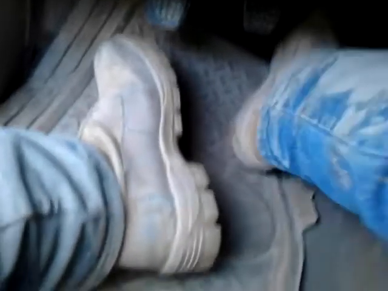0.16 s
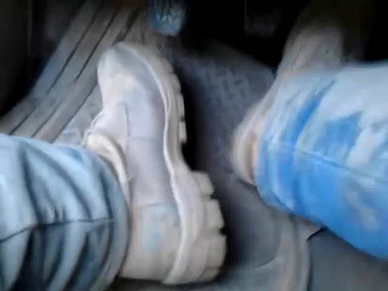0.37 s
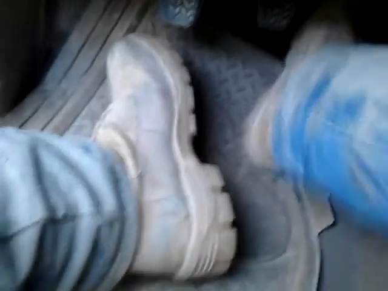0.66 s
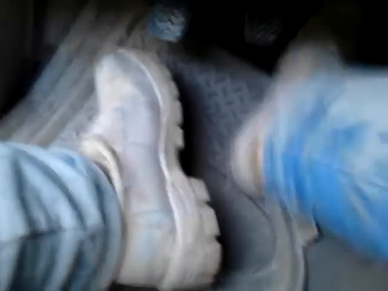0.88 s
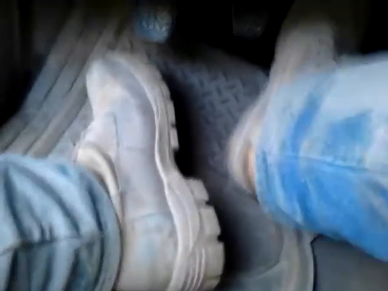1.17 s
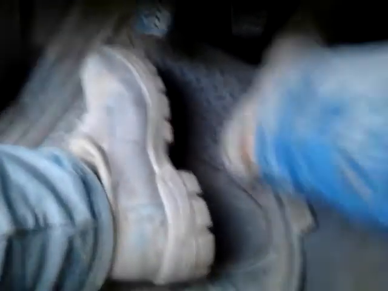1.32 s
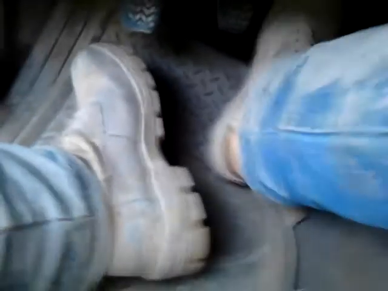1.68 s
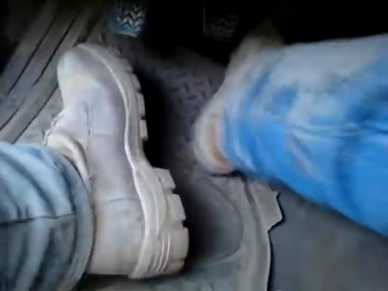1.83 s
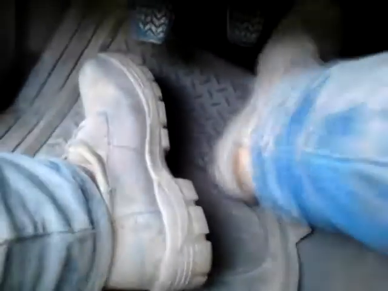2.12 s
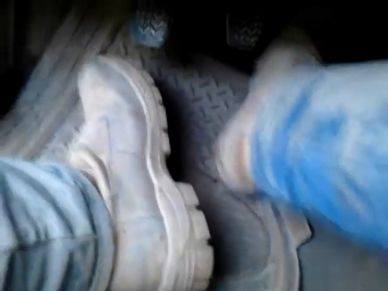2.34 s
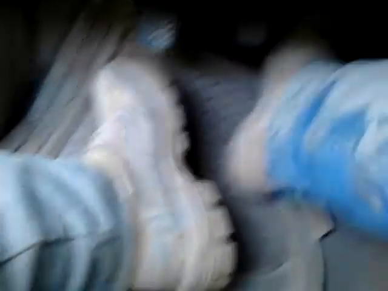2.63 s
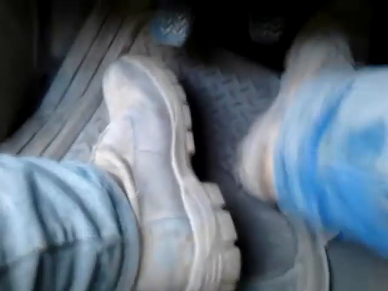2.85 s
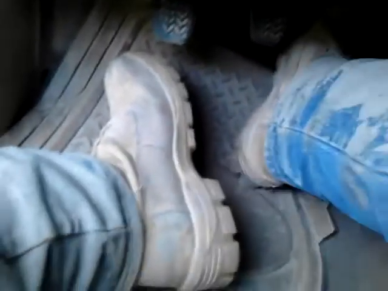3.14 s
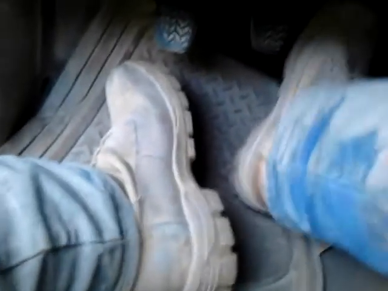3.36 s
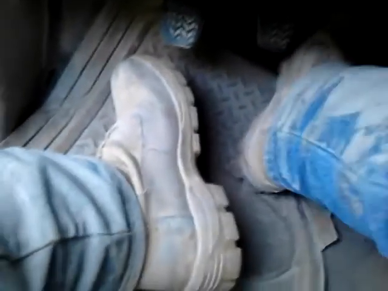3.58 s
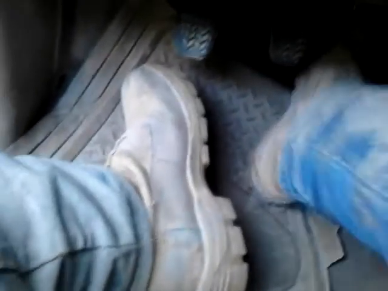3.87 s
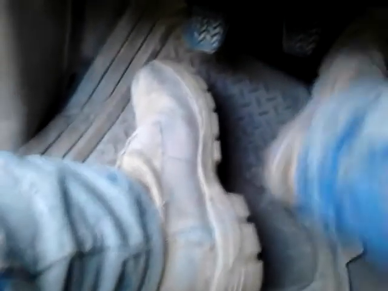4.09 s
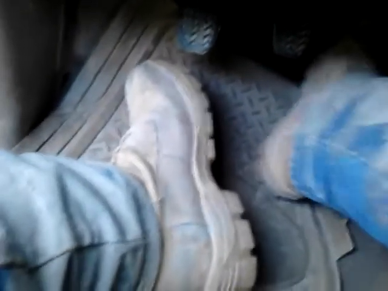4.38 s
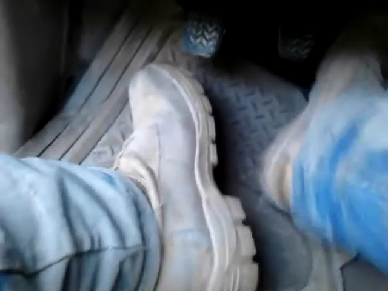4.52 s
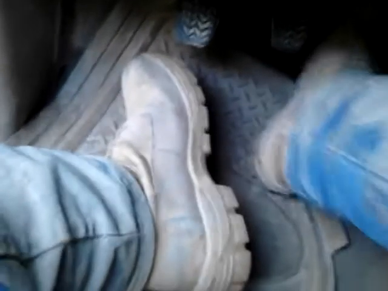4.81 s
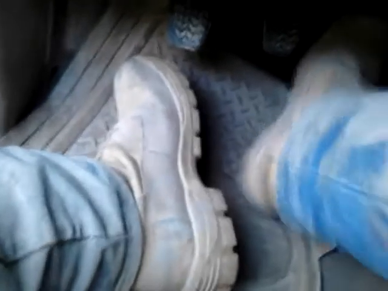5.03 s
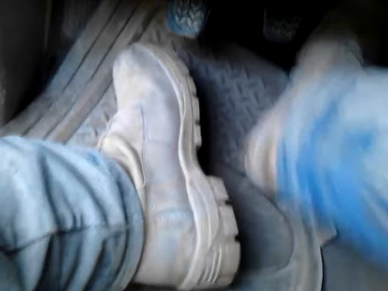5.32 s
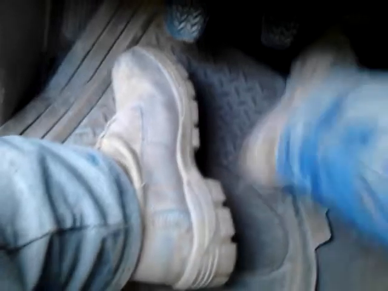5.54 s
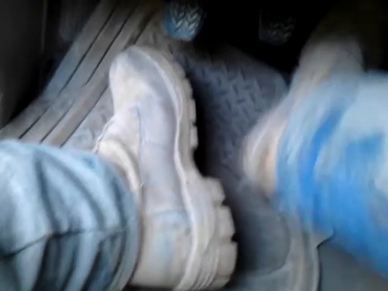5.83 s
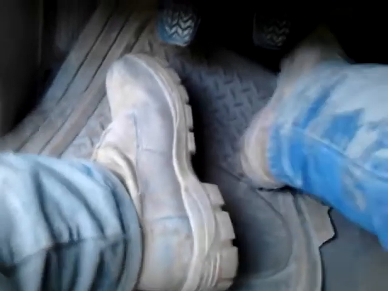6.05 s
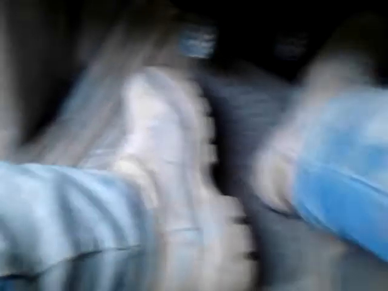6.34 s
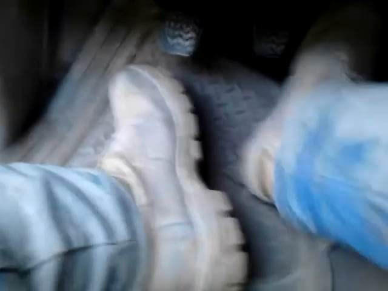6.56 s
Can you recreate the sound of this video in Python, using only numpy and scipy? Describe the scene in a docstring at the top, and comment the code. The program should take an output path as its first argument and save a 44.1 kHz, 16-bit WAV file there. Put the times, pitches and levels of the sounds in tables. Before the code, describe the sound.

Inside a car footwell, a shoe pumps a pedal a little over twice a second. Each press lands as a low, boomy thud with a loose rattle, answered by softer double knocks as the pedal rises. Hard plastic clicks and thin metallic tinkles sound near the handheld microphone, with brief hoarse squeaks. In the later part, cloth scrapes grittily across its case. Low cabin rumble, faint hiss and hum stay underneath.

```python
"""A pedal in a car's footwell, pumped by a foot a little over twice a second: each blow rings the floor's low
modes, shakes filtered noise out of the linkage and clunks the arm, both on the stop and on the way back up.
Plastic clicks and thin tinkles (decaying sine modes) sound near the hand-held microphone; hoarse gliding
squeaks join in, and later cloth, as resonant gritty noise, slides over its case in groups of two or three
strokes. Below lie a low cabin rumble, a faint hiss, the rustle of shoe and trousers and a faint hum."""
import sys
import numpy as np
from scipy import signal
from scipy.fft import rfft, irfft, next_fast_len
from scipy.io import wavfile
from scipy.ndimage import map_coordinates

SR = 44100
rng = np.random.default_rng(int(sys.argv[2]) if len(sys.argv) > 2 else 0)


def waveform_to_disk(signal):
    """Save audio, clipped to [-1, 1], as 16-bit WAV at the path in sys.argv[1]."""
    frames = np.transpose(np.atleast_2d(signal))
    scaled = np.clip(frames, -1, 1) * 32767
    samples = np.round(scaled).astype(np.int16)
    wavfile.write(sys.argv[1], SR, samples)


N = 295425
T = np.arange(int(.2 * SR)) / SR  # time axis of one hit, s

# Levels are relative: layers trim them further. Hits vary around the listed mode pitches.

# low background: rumble level over time (t/s, level/dB)
CABIN_LEVEL = [(0.0, -47), (1.96, -45.5), (3.97, -48.5), (4.4, -44), (4.74, -47.5), (6.7, -42.5)]
# spectra of the background noises (f/Hz, level/dB)
RUMBLE_COLOUR = [(12, -29.5), (20, -14), (32, 2), (50, -0.5), (66, 1.5), (90, -0.5), (136, -4.5),
                 (183, -11.5), (259, -12.5), (326, -17.5), (460, -30), (770, -69.5)]
RUSTLE_COLOUR = [(150, -39), (250, 0.5), (627, -4.5), (660, -4), (849, -7.5), (1150, -10.5), (1440, -11),
                 (1710, -16.5), (1870, -13.5), (2800, -21.5), (3640, -44.5), (6160, -120)]
HISS_COLOUR = [(1800, -25), (2800, 0.5), (3700, 8.5), (4500, 3), (6300, 3.5), (7400, -11.5)]
TROUSER_COLOUR = [(700, -0.5), (1500, -2.0), (3000, -1), (6300, 3.5), (7400, -4.5)]
# trousers brush as the leg moves (t/s, half-width/s, level/dB)
TROUSER_SWISHES = [(0.46, 0.13, -64), (0.99, .08, -78), (1.33, 0.079, -57), (2.42, 0.12, -69),
                   (3.05, 0.12, -60), (3.7, 0.44, -62), (5.12, 0.076, -62)]
# faint steady hum in the cabin (f/Hz, level/dB)
HUM_TONES = [(34.5, -52), (69, -59), (90.5, -55.5), (121, -57)]
# tiny ticks of sole and mat (f/Hz, level/dB)
CRUMB_COLOUR = [(400, 8.5), (1000, 2), (2200, -8), (4000, -11)]

# pedal meets the floor stop (t/s, thud/dB)
STOP_HITS = [(0.1055, -31), (0.5164, -36), (0.909, -29.5), (1.323, -28), (1.763, -27), (2.154, -27),
             (2.5729, -25), (3.0304, -29.5), (3.4499, -31.5), (3.8957, -27.5), (4.33, -27), (4.737, -36),
             (5.1041, -29), (5.5545, -24), (6.0412, -24), (6.423, -24.5)]
# pedal and shoe knock between presses (t/s, thud/dB, rattle/dB, tick/dB, floor shudder/dB)
LIFT_KNOCKS = [(0.218, -33.5, -46, -54, -34), (0.320, -40.5, -43.5, -48, -33.5),
               (0.617, -36.5, -51, -54, -40), (0.715, -37, -41, -38, -43), (1.0463, -34, -44, -45, -30.5),
               (1.1268, -34.5, -42, -47, -48), (1.4564, -33.5, -44.5, -50, -34),
               (1.553, -35.5, -42.5, -43, -40), (1.886, -34, -42.5, -36, -28.5),
               (1.9677, -30, -40, -43, -35), (2.2864, -37, -62, -64, -55),
               (2.3804, -34, -40.5, -37.5, -31.5), (2.732, -30.5, -48, -44.5, -29),
               (2.817, -32, -43.5, -48, -30.5), (3.154, -34.5, -45.5, -45, -33),
               (3.2537, -38, -38.5, -50, -39), (3.5795, -34.5, -46.5, -54, -42),
               (3.689, -40, -42, -43, -54), (4.0364, -25.5, -42, -45, -27),
               (4.0947, -30.5, -37.5, -48, -29), (4.4621, -27, -45.5, -40, -33),
               (4.5217, -31, -40, -41, -27), (5.7085, -25, -37, -47, -45), (5.775, -31, -41.5, -44, -26),
               (6.1511, -33, -51, -42, -37), (6.5285, -35, -49.5, -50, -30)]
# modes of floor pan and cabin air (f/Hz, level/dB, t60/s at damping 1)
FLOOR_MODES = [(94.2, 2.5, 0.16), (118.9, -1, 0.1), (141, -1, 0.1), (179.1, -13.5, 0.15),
               (251, -15.5, 0.17)]
# loose linkage and trim (f/Hz, level/dB)
LINKAGE_COLOUR = [(150, -14.5), (260, 8), (330, 4), (400, -1.5), (490, 4.5), (630, -4.5), (770, -5.5),
                  (1100, -13.5), (1700, -21.5), (2200, -24.5), (4000, -23), (7000, -42.5)]
# modes of the pedal arm (f/Hz, level/dB, t60/s)
ARM_MODES = [(309, -0.5, 0.079), (457, -2.5, 0.069), (542, -5, 0.078), (754, -8.5, 0.054)]

# hard plastic clicks; the harder the contact, the higher the upper edge
# (t/s, level/dB, body/dB, lower ring f/Hz, upper ring f/Hz, upper edge f/Hz)
PLASTIC_CLICKS = [(0.3185, -41.5, 13, 750, 1520, 4000), (0.7754, -15.5, -0.5, 1045, 2040, 3540),
                  (1.098, -42, 9, 700, 1890, 3800), (1.702, -39.5, 5, 750, 1480, 4100),
                  (1.7767, -26.5, -7, 1530, 1850, 2960), (1.804, -37.5, 2, 1500, 2090, 5000),
                  (1.8392, -39, 10, 1730, 3750, 5000), (1.8795, -40, 12, 800, 1500, 2400),
                  (1.895, -33.5, 4, 620, 1410, 2170), (1.9377, -34, 0, 720, 1510, 2000),
                  (2.0115, -21.5, -4, 640, 1475, 2500), (2.384, -41, 6, 565, 1290, 2400),
                  (2.727, -42, 1, 565, 1000, 2200), (2.798, -35.5, 9.5, 500, 970, 1990),
                  (3.06, -36.5, -16, 1000, 1300, 2800), (3.0825, -35.5, -3, 1050, 1700, 2400),
                  (3.14, -34, -7, 600, 1100, 1600), (3.1477, -27, 6.5, 560, 1030, 1900),
                  (3.2219, -22, 8.5, 500, 1040, 3020), (3.4121, -27.5, 3, 595, 1200, 3400),
                  (3.4972, -42, 11, 2400, 3000, 4200), (3.5501, -21.5, 1, 596, 3010, 3700),
                  (3.6164, -32, 4, 620, 1040, 3500), (3.6351, -29.5, 1.5, 700, 1213, 3700),
                  (4.0287, -35.5, -1, 587, 1210, 2940), (4.06, -41.5, 12, 520, 1000, 2000),
                  (4.082, -37, -5, 1000, 1520, 3220), (4.1724, -34, -3, 900, 1400, 3560),
                  (4.582, -34.5, 5, 800, 990, 3500), (5.208, -33, -6, 1000, 2230, 4000),
                  (5.593, -33.5, -4, 990, 2050, 2200), (5.7024, -32.5, -1, 540, 2380, 2520),
                  (5.7643, -34.5, 2, 700, 1930, 1920), (5.785, -37.5, 11, 520, 740, 1500),
                  (6.146, -42, 5, 704, 1000, 2200)]
# modes of the plastic shell (f/Hz, level/dB, t60/s)
SHELL_MODES = [(490, -4, 0.05), (723, -5, 0.034), (1050, 0.5, 0.023), (1376, -6, 0.045),
               (1960, -15.5, 0.044), (2180, -10, 0.029), (2604, -9.5, 0.024), (3220, -3.5, 0.011),
               (4560, -15, 0.0071), (5630, 6, 0.0072), (6460, -1, 0.018)]
# rubbing surfaces briefly stick and slip (t/s, length/s, first f/Hz, last f/Hz, level/dB)
SQUEAK_GLIDES = [(0.63, 0.048, 1022, 766, -44), (1.7, 0.026, 793, 665, -40.5),
                 (3.323, 0.027, 527, 510, -40), (3.425, 0.027, 583, 453, -30.5),
                 (4.202, 0.059, 258, 254, -28.5), (4.254, 0.07, 258, 249, -36.5),
                 (4.386, 0.06, 657, 600, -38.5), (4.415, 0.071, 1035, 782, -41),
                 (5.42, 0.037, 3170, 3100, -38), (5.463, 0.042, 1375, 1346, -40),
                 (6.268, 0.034, 928, 910, -34), (6.355, 0.13, 2305, 2130, -38.5),
                 (6.356, 0.069, 265, 246, -33), (6.58, 0.086, 253, 269, -37)]
# thin tinkles, probably keys swinging (t/s, level/dB)
TINKLE_HITS = [(1.778, -44.5), (1.806, -46), (1.825, -40.5), (1.941, -50), (1.993, -47), (2.0105, -34),
               (3.521, -44), (3.537, -53), (3.552, -37), (3.648, -43), (3.7234, -45.5), (3.76, -47),
               (3.809, -41), (3.855, -51), (4.141, -47), (4.1725, -33), (4.583, -32)]
# modes of the tinkling metal (f/Hz, level/dB, t60/s)
METAL_MODES = [(3540, -4, 0.024), (4540, -11, 0.056), (5570, -2, 0.022), (6350, -1.5, 0.029),
               (6740, -0.5, 0.021)]

# strokes of cloth, one curve each (t/s, scrape/dB)
CLOTH_STROKES = [
    [(4.184, -43), (4.196, -35), (4.228, -39.5), (4.33, -37.5), (4.36, -48)],
    [(4.36, -46.5), (4.398, -38), (4.42, -38.5), (4.428, -37), (4.486, -38.5), (4.57, -56)],
    [(4.59, -43.5), (4.682, -46.5), (4.69, -50), (4.714, -47), (4.776, -59.5), (4.79, -50), (4.82, -62),
     (4.876, -59), (4.924, -49.5), (4.95, -68)],
    [(5.17, -63), (5.188, -49), (5.198, -68), (5.208, -38), (5.22, -34.5), (5.238, -39), (5.308, -39),
     (5.314, -35), (5.382, -44), (5.41, -49)],
    [(5.415, -42), (5.419, -50), (5.433, -32), (5.445, -39.5), (5.459, -33), (5.517, -38.5), (5.587, -54.5),
     (5.597, -45.5), (5.655, -57.5), (5.68, -63)],
    [(6.21, -55), (6.22, -49.5), (6.248, -53), (6.254, -39), (6.284, -32.5), (6.298, -38.5), (6.454, -39.5),
     (6.468, -43), (6.505, -45.5)],
    [(6.51, -44), (6.524, -43), (6.54, -33), (6.622, -37.5), (6.69, -56)],
]
# a pressed fold sings in each stroke, one row per stroke (f/Hz, width/Hz, level/dB)
FOLD_RINGS = [(2210, 180, -9.5), (1350, 270, -9), (900, 250, -2), (2110, 180, -8), (1430, 120, -7),
              (2260, 120, -12), (1520, 200, -5)]
# cloth sliding firmly on the case (f/Hz, level/dB)
CASE_COLOUR = [(420, -5), (500, -1.5), (700, 2), (950, 0), (1200, -1.5), (1450, 1.5), (1800, -7),
               (2220, -2), (2600, -7.5), (3100, -8.5), (3800, -14.5), (4600, -27.5)]
# narrow resonances of the case (f/Hz, width/Hz, level/dB)
CASE_RINGS = [(433, 22, -3.5), (693, 16, -4.5), (773, 18, 8.5), (897, 22, 6), (989, 39, 6), (1410, 26, -7),
              (2155, 86, -7.5), (3080, 27, -3.5), (3190, 60, -7.5)]
# low drag of the cloth (t/s, level over the scrape/dB)
DRAG_LEVEL = [(4.19, -7), (4.22, 2.5), (4.33, 0), (4.39, -11), (4.5, 7), (4.6, -4.5), (4.8, 12.5),
              (5.21, -8), (5.25, 2), (5.36, 10), (5.43, -8), (5.53, 1.5), (5.6, 2), (6.25, 5), (6.28, -2.5),
              (6.42, -1), (6.56, -11.5), (6.64, 7.5)]
# cloth snags and slips free with a bright flare (t/s, fizz gained/dB)
CLOTH_SNAGS = [(4.192, 15), (4.371, 16.5), (5.212, 12.5), (5.452, 18), (6.262, 12), (6.53, 10.5),
               (6.562, 13)]
# light stroke, low drag and fizz of the cloth (f/Hz, level/dB)
LIGHT_COLOUR = [(300, 0.0), (500, 0.0), (1000, 6), (1400, -7.5), (2300, -12.5), (3500, -22.5)]
DRAG_COLOUR = [(90, 13), (140, 4), (195, 1), (255, 9), (340, 2), (400, -6.5), (450, 2), (560, -15.0)]
FIZZ_COLOUR = [(3600, -2.0), (4500, 1.0), (5600, 3.0), (7300, -8.5)]
# answer of trim and glass (f/Hz, level/dB)
TRIM_COLOUR = [(280, 2.0), (1000, 2.0), (3000, -3.5), (7000, 5.5)]

# background: depth of the hiss's flicker; the recorder's band limit
HISS_FLICKER_DB, TOP_HZ = 1.8, 7400
# crumbs: gain, ring, mean rate, scatter of strength
CRUMB_DB, CRUMB_T60, CRUMBS_PER_S, CRUMB_SCATTER_DB = -60.5, 0.027, 35, 3.5
# reference thud of a soft press, its rattle, and the dB of rattle gained per dB of thud
SOFT_THUD_DB, SOFT_RATTLE_DB, RATTLE_GROWS = -33.5, -44, 0.31
# harder blows favour higher modes (dB per octave per dB of thud) and die sooner (damping per dB)
HARD_BRIGHTENS, HARD_DAMPS = 0.34, 0.012
# padding before a blow, room for the bass cut's short soft lead-in
LEAD_S = .006
# loose parts chatter again after about this long
REBOUND_S = .028
# pedal arm: level against the rattle, detuning by the grip of the shoe (share), rise time constant
ARM_DB, ARM_DETUNE, ARM_RISE_S = -5, 0.073, 0.0032
# floor shudder: centre pitch, decay, and the pitch below which it thins out
SWAY_HZ, SWAY_T60, SWAY_EDGE_HZ = 55.6, 0.1, 36
# a dull tick leads each knock of the rising pedal: lead, body, its two rings, upper edge
TICK_LEAD_S, TICK_BODY_DB, TICK_RING_HZ, TICK_EDGE_HZ = .0035, 1, (432, 900), 2100
# a click of SNAP_DB rises in SNAP_S; lighter touches slide in more slowly
SNAP_DB, SNAP_S = -18.5, 0.00037
# the body level holds below BODY_HZ and fades out across it; treble falls from the edge to a shelf
BODY_HZ, EDGE_DB_PER_OCTAVE, SHELF_HZ = (680, 1050), -21, 5770
# the struck part's lower and upper ring: levels and t60 (s)
PART_DB, PART_T60 = (-1, 1), (0.046, 0.033)
# the first contact is a single push: its time scale and level against the click
CONTACT_S, CONTACT_DB = 0.00044, -4
# squeak hoarseness: scatter of the slips' strength, and of their rate (Hz per root Hz)
HOARSE_DB, SLIP_JITTER = 3.5, 3.2
# the cloth takes hold and lets go in GRIP_S; half-width of a snag
GRIP_S, SNAG_S = 0.005, 0.013
# reference scrape of a firm stroke; the fizz at that level, and how far it follows the scrape
FIRM_DB, FIZZ_DB, FIZZ_FOLLOWS = -34, -55.5, 0.63
# fibres catch: rate (per s), scatter of strength, and the coarser scatter at a pressed fold
FIBRE_RATE, FIBRE_DB, CATCH_DB = 450, 2.8, 5
# fold resonances between cloth and case: how fast they sink, their spacing, life and depth
SINK_OCTAVES_PER_S, FOLD_SPACING_HZ, FOLD_LIFE_S, FOLD_DB = 1.6, 75, .08, 3.8
# the cloth flutters as it slides: rate (per s) and depth
FLUTTER_RATE, FLUTTER_DB = 70, 1.2


def amp(db):
    """Decibels to gain."""
    return np.exp(np.asarray(db) * (np.log(10) / 20))


def unit(x):
    """x at rms 1."""
    return x / np.sqrt(np.mean(x ** 2) + 1e-20)


def fade(t60):
    """Free decay over the length of one hit."""
    return np.exp(-np.log(1000) * T / t60)


def onset(time_constant):
    """Soft exponential rise of one hit."""
    return 1 - np.exp(-T / time_constant)


def early(x):
    """A hit scaled to rms 1 over its first 40 ms."""
    return x / np.sqrt(np.mean(x[:SR // 25] ** 2))


def add(track, s, x):
    """Mix x into the track at time s."""
    i = max(round(s * SR), 0)
    track[i:i + len(x)] += x[:len(track) - i]


def curves(rows):
    """One value per sample for each column after the time."""
    s, *cols = np.transpose(rows)
    return [np.interp(np.arange(N) / SR, s, c) for c in cols]


def wobble(rate, size):
    """A random curve, rate knots a second; it holds still after its last knot."""
    knots = rng.standard_normal(1000)
    return np.interp(np.arange(size) * rate / SR, np.arange(len(knots)), knots)


def grit(size, rate, spiky_db):
    """Noise whose strength jumps about like tiny contacts, about rate a second."""
    return rng.standard_normal(size) * amp(spiky_db * wobble(rate, size))


def colour(x, points):
    """x shaped by (f/Hz, level/dB) points, falling steeply beyond them; rms 1."""
    f, db = np.transpose(points)
    m = next_fast_len(len(x) + 1024, True)
    octave = np.log2(np.fft.rfftfreq(m, 1 / SR) + 1)
    edges = np.log2(np.r_[f[0] / 2, f, f[-1] * 2])
    gain = amp(np.interp(octave, edges, np.r_[db[0] - 40, db, db[-1] - 40]))
    return unit(irfft(rfft(x, m) * gain, m)[:len(x)])


def resonate(x, rings):
    """x through narrow (f/Hz, width/Hz, level/dB) resonances; rms 1."""
    m = next_fast_len(len(x) + 4096)
    f = np.fft.rfftfreq(m, 1 / SR)
    gain = sum(amp(db) * 1j * f * width / (hz * hz - f * f + 1j * f * width) for hz, width, db in rings)
    return unit(irfft(rfft(x, m) * gain, m)[:len(x)])


def sliding(x):
    """x through a thicket of narrow resonances that come and go while they sink in pitch."""
    hz, t, z = signal.stft(x, SR, nperseg=1024)
    across = hz[:, None] * 2 ** (SINK_OCTAVES_PER_S * (t - t.mean())) / FOLD_SPACING_HZ
    along = np.broadcast_to(t / FOLD_LIFE_S, across.shape)
    knots = rng.standard_normal((512, 32))
    field = map_coordinates(knots, [across, along], mode="mirror")
    return signal.istft(z * amp(FOLD_DB * field), SR, nperseg=1024)[1][:len(x)]


def thinned(x, edge_hz):
    """A hit without its deepest bass, padded by LEAD_S for the zero-phase filter's lead-in."""
    high_pass = signal.butter(2, edge_hz, "high", fs=SR, output="sos")
    padded = np.pad(x, (int(LEAD_S * SR), 0))
    return signal.sosfiltfilt(high_pass, padded, padtype=None)


def presses():
    """A harder press shakes the linkage a little more: (t/s, thud/dB, rattle/dB)."""
    return [(s, db, SOFT_RATTLE_DB + RATTLE_GROWS * (db - SOFT_THUD_DB)) for s, db in STOP_HITS]


def pedal_motion():
    """How busy the foot is: a smooth swell around every knock, mean 1."""
    busy = np.zeros(N)
    for s, _, shake_db, *_ in [*presses(), *LIFT_KNOCKS]:
        add(busy, s - .06, amp(shake_db / 2) * np.hanning(int(.15 * SR)))
    return busy / busy.mean()


def cabin():
    """Low rumble, a faint hiss, and the rustle of shoe and trousers that follows the foot."""
    rumble_db, = curves(CABIN_LEVEL)
    rumble = amp(rumble_db - 0.1) * colour(grit(N, rate=6.2, spiky_db=1.0), RUMBLE_COLOUR)
    rustle_level = amp(-57.0) + amp(-66.5) * pedal_motion()
    rustle = rustle_level * colour(grit(N, rate=140, spiky_db=2.5), RUSTLE_COLOUR)
    hiss = amp(-65.5) * colour(grit(N, rate=62, spiky_db=HISS_FLICKER_DB), HISS_COLOUR)
    t = np.arange(N) / SR
    brush = sum(amp(db) * np.exp(-((t - s) / width) ** 2) for s, width, db in TROUSER_SWISHES)
    trousers = brush * colour(grit(N, rate=220, spiky_db=2.5), TROUSER_COLOUR)
    return rumble + rustle + hiss + trousers


def hum():
    """A few low tones that hardly waver."""
    t = np.arange(N) / SR
    return sum(amp(db) * unit(np.sin(2 * np.pi * hz * t + .4 * wobble(2.6, N))) for hz, db in HUM_TONES)


def crumbs():
    """Tiny ticks of sole and mat, more of them while the foot is busy."""
    struck = rng.random(N) < CRUMBS_PER_S * pedal_motion() / SR
    hits = struck * amp(CRUMB_SCATTER_DB * np.clip(rng.standard_normal(N), -2, 2))
    level = np.abs(signal.fftconvolve(hits, fade(CRUMB_T60))[:N])
    return amp(CRUMB_DB) * level * colour(sliding(rng.standard_normal(N)), CRUMB_COLOUR)


def floor_boom(force_db, damping, detune):
    """The floor's modes ring down, each a little off its level and pitch."""
    boom = 0
    for hz, level, t60 in FLOOR_MODES:
        octaves_up = min(np.log2(hz / FLOOR_MODES[0][0]), .5)  # brightening stops at half an octave
        gain = amp(level + HARD_BRIGHTENS * force_db * octaves_up + rng.normal())
        tone = np.sin(2 * np.pi * hz * (1 + detune * rng.normal()) * T)
        boom = boom - gain * tone * fade(t60 / (damping + HARD_DAMPS * force_db))
    return boom


def knocks(rows, contact, damping, detune, edge_hz, thud_db, rattle_db, rattle_t60, rattle_rise, rebound_db):
    """Each padded blow booms through the floor pan and shakes the linkage."""
    out = np.zeros(N)
    for s, db, shake_db, *_ in rows:
        boom = floor_boom(db - SOFT_THUD_DB, damping, detune) * onset(contact)
        add(out, s - LEAD_S, amp(db + thud_db) * early(thinned(boom, edge_hz)))
        # loose parts chatter from the first touch, before the pad has fully sunk in, then fall back
        rebound = REBOUND_S * (1 + 0.15 * rng.normal())
        for delay, loss_db in [(0, 0), (rebound, rebound_db)]:
            chatter = colour(grit(len(T), rate=295.5, spiky_db=3.5), LINKAGE_COLOUR)
            chatter = chatter * fade(rattle_t60) * onset(rattle_rise)
            add(out, s + delay - .002, amp(shake_db + rattle_db + loss_db) * early(chatter))
    return out


def arm():
    """The pedal arm's modes clunk as it is knocked, a little differently each time."""
    out = np.zeros(N)
    for s, _, shake_db, *_ in [*presses(), *LIFT_KNOCKS]:
        ring = 0
        for hz, level, t60 in ARM_MODES:
            tone = np.sin(2 * np.pi * hz * (1 + ARM_DETUNE * rng.normal()) * T)
            ring = ring + amp(level + rng.normal(0, 1.1)) * fade(t60) * tone
        add(out, s, amp(shake_db + ARM_DB) * early(ring * onset(ARM_RISE_S)))
    return out


def sway():
    """The heel pushes the floor, which gives with a deep, short shudder."""
    out = np.zeros(N)
    for s, _, _, _, db in LIFT_KNOCKS:
        hz = SWAY_HZ * (1 + 0.1 * rng.normal())
        shudder = np.sin(2 * np.pi * hz * T) * fade(SWAY_T60) * onset(0.0034)
        add(out, s - LEAD_S, -amp(db - 3.0) * early(thinned(shudder, SWAY_EDGE_HZ)))
    return out


def click_answer(hz, body_db, edge_hz):
    """Gain in dB at hz: a broad touch wakes the body, a hard one the treble."""
    octaves_over = np.log2(np.maximum(np.minimum(hz, SHELF_HZ) / edge_hz, 1))
    return np.interp(hz, BODY_HZ, [body_db, 0]) + EDGE_DB_PER_OCTAVE * octaves_over


def clicks():
    """A click rings the struck part and the plastic shell, with a noisy crack and one first push."""
    out = np.zeros(N)
    ticks = [(s - TICK_LEAD_S, tick_db, TICK_BODY_DB, *TICK_RING_HZ, TICK_EDGE_HZ)
             for s, _, _, tick_db, _ in LIFT_KNOCKS]
    grid = np.geomspace(420, 7300, 16)
    push = (1 - T / CONTACT_S * 2) * np.exp(-T / CONTACT_S * 2)
    for s, db, body_db, lower_hz, upper_hz, edge_hz in [*PLASTIC_CLICKS, *ticks]:
        shell = [(hz, level + click_answer(hz, body_db, edge_hz), t60) for hz, level, t60 in SHELL_MODES]
        part = list(zip((lower_hz, upper_hz), PART_DB, PART_T60))
        ring = 0
        for hz, level, t60 in shell + part:
            tone = np.sin(2 * np.pi * (hz * (1 + 0.012 * rng.normal()) * T + rng.random()))
            ring = ring + amp(level + rng.normal(0, 1.5)) * fade(t60) * tone
        answer_db = click_answer(grid, body_db, edge_hz)
        crack_colour = np.c_[grid, answer_db - 1.2 * np.log2(grid)]
        crack = colour(rng.standard_normal(len(T)), crack_colour) * fade(0.039)
        crack_size = np.sqrt(np.mean(amp(answer_db) ** 2))
        rise = np.clip(SNAP_S * amp((SNAP_DB - db) / 1.5), .0002, .0014)
        body = amp(-6) * ring + amp(-5.0) * crack_size * crack
        add(out, s - rise / 2, amp(db) * body * onset(rise))
        add(out, s - rise / 2, amp(db + CONTACT_DB) * min(SNAP_S / rise, 1) * push)
    return out


def squeaks():
    """Slips at an unsteady rate make a short, hoarse, gliding note."""
    out = np.zeros(N)
    for s, length, first_hz, last_hz, db in SQUEAK_GLIDES:
        n = int(length * SR)
        hz = np.linspace(first_hz, last_hz, n) + SLIP_JITTER * np.sqrt(first_hz) * wobble(500, n)
        swell = np.sqrt(np.hanning(n)) * amp(HOARSE_DB * wobble(220, n))
        add(out, s, amp(db - 6.0) * unit(swell * np.sin(2 * np.pi * np.cumsum(hz) / SR)))
    return out


def tinkles():
    """Small pieces of metal brush together and ring briefly, each a little differently."""
    out = np.zeros(N)
    for s, db in TINKLE_HITS:
        ring = 0
        for hz, level, t60 in METAL_MODES:
            phase = 2 * np.pi * hz * (1 + 0.033 * rng.normal()) * T + 1.5 * wobble(600, len(T))
            ring = ring + amp(level + rng.normal(0, 0.63)) * fade(t60) * np.sin(phase)
        add(out, s - .002, amp(db + 1.5) * ring * onset(0.0013))
    return out


def cloth():
    """Fibres catch on the case: a scrape through shifting folds, a low drag, a fizz that flares at snags."""
    out = np.zeros(N)
    drag_db, = curves(DRAG_LEVEL)
    for stroke, (ring_hz, ring_width, ring_db) in zip(CLOTH_STROKES, FOLD_RINGS):
        start, end = stroke[0][0] - GRIP_S, stroke[-1][0] + GRIP_S
        span = slice(int(start * SR), min(int(end * SR), N))
        scrape_db = curves(stroke)[0][span]
        t = np.arange(len(scrape_db)) / SR
        snag_db = sum(gain_db * np.exp(-((start + t - s) / SNAG_S) ** 2) for s, gain_db in CLOTH_SNAGS)
        fizz_db = FIZZ_DB + FIZZ_FOLLOWS * (scrape_db - FIRM_DB) + snag_db
        fibres = grit(len(t), rate=FIBRE_RATE, spiky_db=FIBRE_DB)
        folded = sliding(fibres)
        catches = grit(len(t), rate=FIBRE_RATE, spiky_db=CATCH_DB)
        fold = resonate(catches, [(ring_hz, ring_width, 0)])
        case = colour(folded, CASE_COLOUR) + amp(-6) * resonate(folded, CASE_RINGS)
        firm = unit(case + amp(ring_db) * fold)
        light = colour(folded, LIGHT_COLOUR)
        # fully firm down to 14 dB under FIRM_DB, fully light 28 dB under it
        firmness = np.clip(2.0 + (scrape_db - FIRM_DB) / 14, 0, 1)
        scrape = amp(scrape_db + 0.5) * (firmness * firm + (1 - firmness) * light)
        drag = amp(scrape_db + drag_db[span] - 1.5) * colour(fibres, DRAG_COLOUR)
        fizz = amp(fizz_db) * colour(fibres, FIZZ_COLOUR)
        grip = np.clip(np.minimum(t, t[::-1]) / GRIP_S, 0, 1)
        flutter = amp(FLUTTER_DB * wobble(FLUTTER_RATE, len(t)))
        add(out, start, grip * flutter * (scrape + drag + fizz))
    return out


def reflections(x, t60):
    """Trim and glass give a very short, dense answer above the bass."""
    tail = colour(rng.standard_normal(len(T)), TRIM_COLOUR) * fade(t60) * np.clip(T / 0.00072, 0, 1)
    return signal.fftconvolve(x, tail / np.linalg.norm(tail))[:N]


def scene():
    """Pedal, clicks, squeaks, tinkles, cloth and cabin at one microphone."""
    background = cabin() + hum()
    down = knocks(presses(), contact=0.005, damping=0.93, detune=0.02, edge_hz=59.4, thud_db=2.0,
                  rattle_db=-2.0, rattle_t60=0.085, rattle_rise=0.0044, rebound_db=-8)
    up = knocks(LIFT_KNOCKS, contact=0.0051, damping=1.04, detune=0.035, edge_hz=42, thud_db=2.5,
                rattle_db=-1.1, rattle_t60=0.069, rattle_rise=.007, rebound_db=-11.0)
    pedal = crumbs() + down + up + arm() + sway()
    near = pedal + clicks() + squeaks() + tinkles() + cloth()
    return (near + amp(-10.5) * reflections(near, t60=.075) + background)[None]


def record(dry):
    """The recorder cuts very steeply above its band limit."""
    m = next_fast_len(N + SR // 2)
    hz = np.fft.rfftfreq(m, 1 / SR)
    return irfft(rfft(dry, m) / np.sqrt(1 + (hz / TOP_HZ) ** 100), m)[..., :N]


dry = scene()
out = record(dry)
waveform_to_disk(out)
```